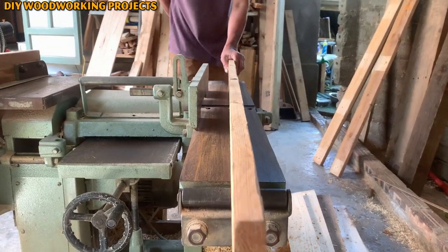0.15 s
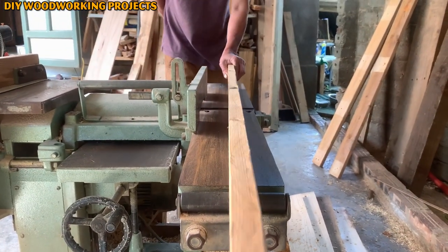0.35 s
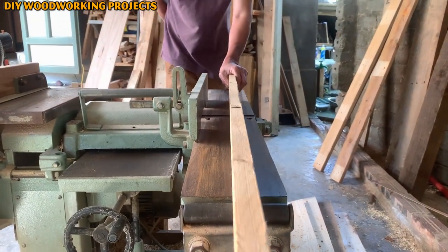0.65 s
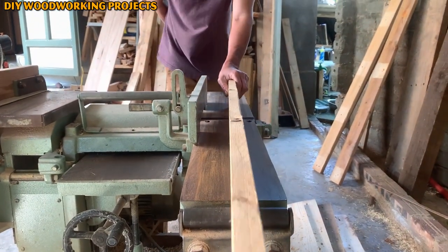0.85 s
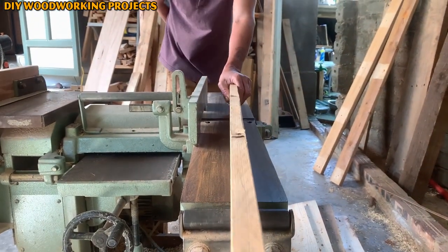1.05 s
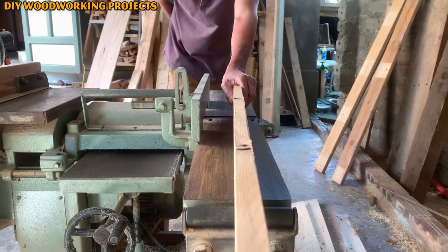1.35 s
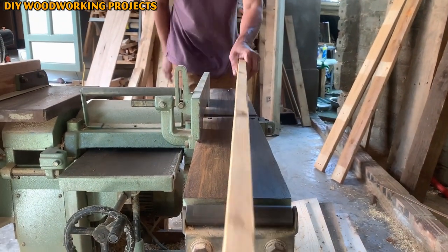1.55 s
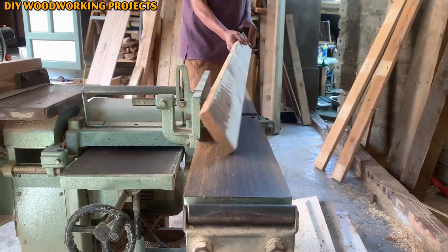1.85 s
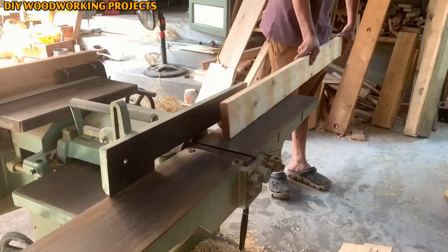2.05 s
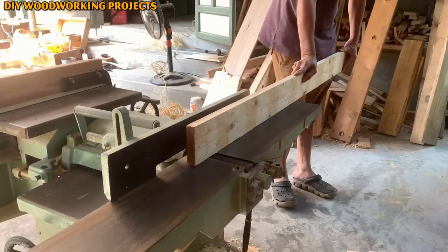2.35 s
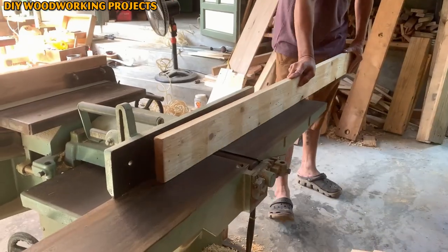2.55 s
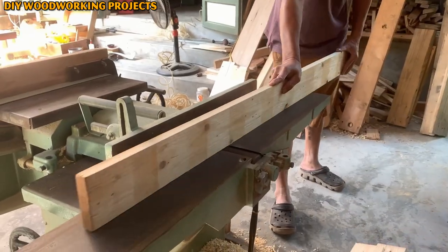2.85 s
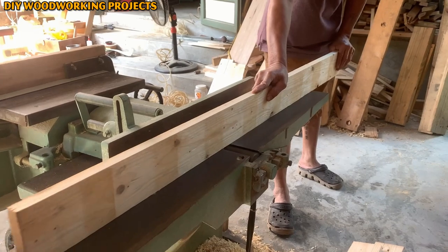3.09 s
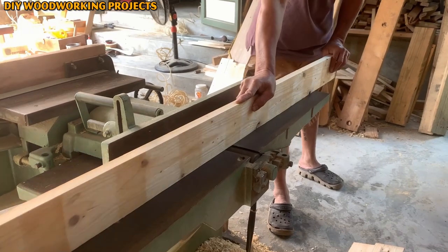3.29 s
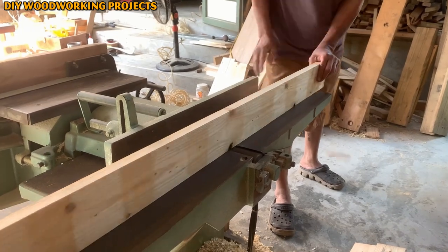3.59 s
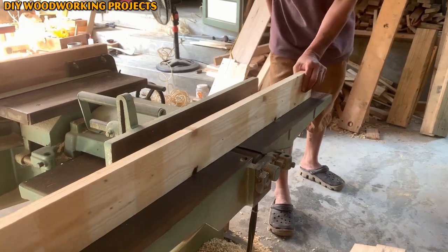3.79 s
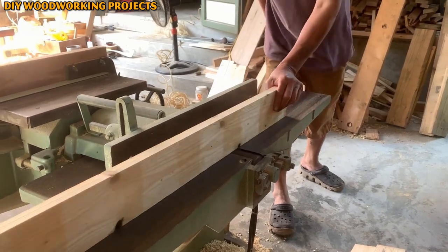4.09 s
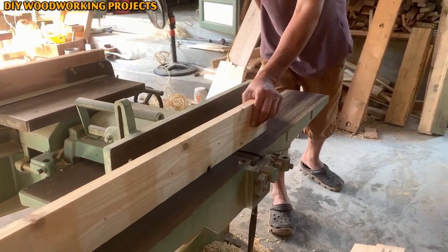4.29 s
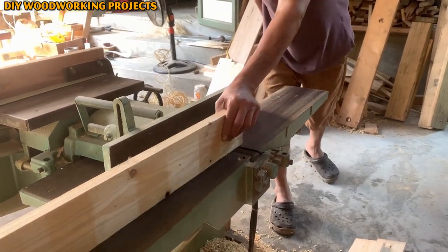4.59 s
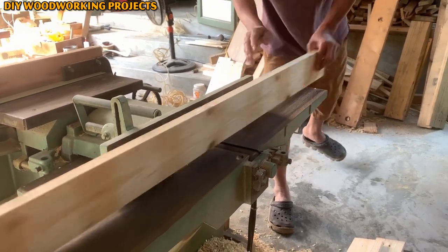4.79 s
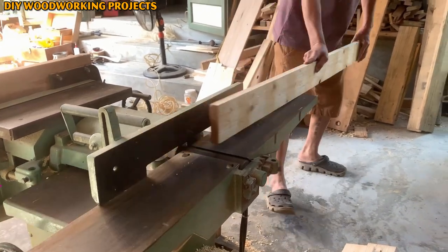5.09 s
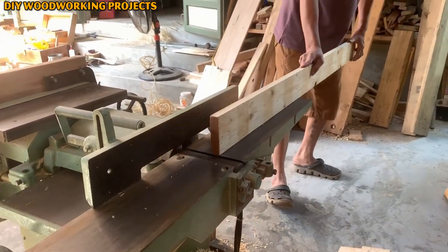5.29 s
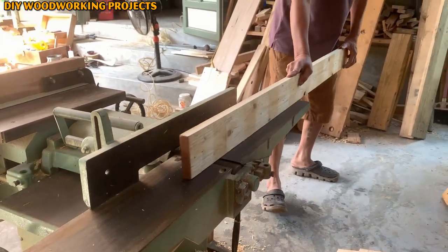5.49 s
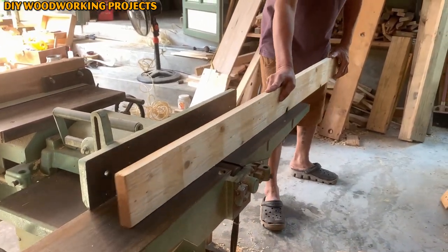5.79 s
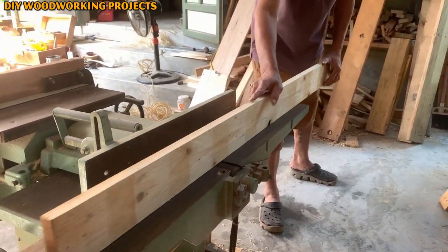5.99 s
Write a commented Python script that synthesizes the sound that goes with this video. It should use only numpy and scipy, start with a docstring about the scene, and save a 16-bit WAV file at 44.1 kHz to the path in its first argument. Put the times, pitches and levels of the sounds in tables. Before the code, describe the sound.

In a workshop, a jointer keeps up a steady beating whine and airy roar. A board passes with a loud bright hiss, crunching at a hard knot, then scrapes back with squeals and knocks. After a tiny dip the machine sounds thinner and quieter from the side; a second pass hisses gradually stronger, the board bumps and squeaks back, and a third pass begins. Close stereo microphone.

```python
"""Jointer in a workshop

A jointer is heard from the outfeed end and, after a very short dip in level, from the side.
Its whine is a stack of steady tones beating with the motor; its air is noise chopped by the knives.
Each stroke is a burst of noise tearing a chip; knots and knocks ring resonances of the board.
The board is dragged back squealing on the iron table (ticks and noise) and is pushed through again.
"""
import sys
import numpy as np
from scipy import signal
from scipy.fft import rfft, irfft
from scipy.io import wavfile
from scipy.ndimage import uniform_filter1d, map_coordinates

SR = 44100
rng = np.random.default_rng(int(sys.argv[2]) if len(sys.argv) > 2 else 0)


def pcm_store(signal):
    """Save signal as 16-bit PCM."""
    levels = np.round(np.clip(np.atleast_2d(signal), -1, 1) * 32767)
    wavfile.write(sys.argv[1], SR, levels.astype(np.int16).T)


N = 270774
T = np.arange(N) / SR  # time of each sample, s
HZ = np.fft.rfftfreq(N, 1 / SR)
VIEW_ENDS_S, VIEW_STARTS_S = 2.096, 2.113  # the end view stops, the side view starts
IDLE_HZ = 243.27  # knife strokes per second of the free-running head
# a stretch of cutting, hard grain or shudder starts this much weaker; this is its usual dying away
START_DB, RELEASE_DB_PER_S = -9, 342


def amp(db):
    """Decibels to a plain gain."""
    return 10 ** (np.asarray(db) / 20)


def unit(x):
    """Scales a signal to rms 1."""
    return x / np.sqrt(np.mean(x ** 2) + 1e-20)


def read(points, hz):
    """A spectrum's value at hz, on a log-frequency axis."""
    point_hz, value = np.transpose(points)
    return np.interp(np.log(hz + 1), np.log(point_hz), value)


def level(rows):
    """Gain along a (time_s, level_db) curve, fading quickly outside it."""
    time_s, level_db = np.transpose(rows)
    outside_s = np.maximum(time_s[0] - T, 0) + np.maximum(T - time_s[-1], 0)
    return amp(np.interp(T, time_s, level_db) - 600 * outside_s)


def drift(rate_hz):
    """A smooth random curve of rms 1; a higher rate wanders faster."""
    count = 2048
    hz = np.fft.rfftfreq(count, N / SR / count)
    slow = irfft(rfft(rng.standard_normal(count)) / (1 + (hz / rate_hz) ** 2))
    return np.interp(T, np.linspace(0, N / SR, count), unit(slow))


def arch(middle_s, half_s):
    """A bell of height 1 around middle_s."""
    return np.exp(-((T - middle_s) / half_s) ** 2)


def held(start_s, end_s, rise_s, level_db, release_db_per_s=RELEASE_DB_PER_S):
    """Gain of one stretch of cutting or shuddering: it gathers strength, holds and dies away."""
    weak = np.clip(1 - (T - start_s) / rise_s, 0, 1)
    outside_s = 2 * np.maximum(start_s - T, 0) + np.maximum(T - end_s, 0)
    return amp(level_db + START_DB * weak - release_db_per_s * outside_s)


def together(gains):
    """Gains of overlapping sounds add in power."""
    return np.sqrt(sum(gain ** 2 for gain in gains))


def cover(start_s, end_s):
    """How far a passing board covers the gap, 0-1."""
    cover_s = .1  # time the board takes to cover the gap
    return np.clip(np.minimum(T - start_s, end_s - T) / cover_s + .5, 0, 1)


def swell():
    """A steady rise of the machine heard from the side; gain 1 halfway through that view."""
    rise_db_per_s = 2
    return amp(rise_db_per_s * (T - (VIEW_STARTS_S + T[-1]) / 2))


def colour(x, spectrum, band_hz):
    """Filters a mid-side pair so that the mid has rms 1 within the band."""
    z = rfft(x) * amp(read(spectrum, HZ))
    inside = irfft(z[0] * (HZ > band_hz[0]) * (HZ < band_hz[1]), N)
    return irfft(z, N) / inside.std()


def ring(x, modes):
    """A bank of steep resonances, each a peak squared to narrow it; the result has rms 1."""
    response = 0
    for pitch_hz, width_hz, level_db in modes:
        off_pitch = (HZ ** 2 - pitch_hz ** 2) / (width_hz * HZ + 1e-6)
        response = response + amp(level_db) / (1 + 1j * off_pitch) ** 2
    return unit(irfft(rfft(x) * response, N))


def focused(pair, share):
    """A small source reaches both ears partly alike, only shifted in phase."""
    share = np.clip(share, 0, 1)
    shifted = signal.hilbert(pair[0]).imag
    return np.array([pair[0], np.sqrt(share) * shifted + np.sqrt(1 - share) * pair[1]])


# passes of the board over the knives: start_s, end_s, sag_hz (drop of the stroke rate)
PASSES = [(-.1, 1.5, .32), (2.45, 4.6, .32), (5.7, 6.3, .2)]


def head_turns(wobble_hz=0.045):
    """Knife strokes counted since the start; the head sags under load and the belt drive wobbles."""
    sag_hz = sum(drop_hz * cover(start_s, end_s) for start_s, end_s, drop_hz in PASSES)
    return np.cumsum(IDLE_HZ - sag_hz + wobble_hz * drift(3.8)) / SR


def tone(turns, waver, spread, lean=0):
    """A partial as a mid-side pair; reflections make it waver and reach the ears out of step."""
    angle = (2 * np.pi * (turns - np.floor(turns))).astype(np.float32)
    cos, sin = np.cos(angle), np.sin(angle)
    wander = np.array([1 + waver * drift(20.6), waver * drift(8.1)])
    direct, shifted = wander / np.sqrt(1 + 2 * waver ** 2)
    mid = direct * cos - shifted * sin
    side = (waver * drift(3.0) - shifted) * cos - (waver * drift(4.5) + direct) * sin
    return np.sqrt(2) * np.array([mid, lean * mid + spread * side])


# single partials swell or sink briefly as the board slides by:
# middle_s, half_length_s, multiple (of the stroke rate), change_db
PARTIAL_SWELLS = [(0.054, 0.12, 18, 8), (0.153, 0.42, 6, -7), (0.538, 0.09, 18, 15), (0.546, 0.092, 8, 4),
                  (0.885, 0.15, 10, -21), (1.35, 0.21, 8, -20), (1.48, 0.11, 2, -5), (1.483, 0.11, 6, -3),
                  (1.68, 0.047, 6, 3), (2.503, 0.62, 2, -1.5), (2.77, 0.11, 8, -6), (3.018, 0.071, 24, 8),
                  (3.0, 0.11, 10, 6), (3.45, 0.35, 20, -8), (4.232, 0.18, 18, 12.5), (4.56, 0.3, 6, 7.5),
                  (5.412, .2, 2, 2), (6.05, 0.39, 6, 9.5), (6.098, 0.065, 8, 6.5)]


def partial_gain(order, open_db, start_db, end_db, wander_db=-0.5):
    """A partial leaves its open-gap level while a board covers the gap, and slides as it travels."""
    db = open_db
    for start_s, end_s, _ in PASSES:
        board_db = np.interp(T, [start_s, end_s], [start_db, end_db])
        db = db + cover(start_s, end_s) * (board_db - open_db)
    for middle_s, half_s, multiple, change_db in PARTIAL_SWELLS:
        if round(multiple) == order:
            db = db + change_db * arch(middle_s, half_s)
    return amp(db + wander_db * np.log10(order / 2) * drift(7.4))


# main partials of the whine from the end and from the side, before main_db is added:
# multiple (of the stroke rate), open_db (gap open), start_db (pass starts), end_db (pass ends),
# lean (to the left, plain ratio)
WHINE_END = [(2, -40, -43, -40, -0.24), (4, -50.5, -45, -55.5, 0.1), (6, -37, -36.5, -39, -0.42),
             (8, -51.5, -44, -51, -0.46), (10, -46, -49.5, -40.5, 0.13), (18, -42, -47.5, -45, -0.0086)]
WHINE_SIDE = [(2, -39.5, -38, -40, -0.39), (4, -52, -54, -52.5, 0.24), (6, -62, -63.5, -55.5, -0.88),
              (8, -53, -46, -47, 0.044), (10, -53, -52.5, -55.5, .35), (18, -57.5, -50.5, -57, -0.24),
              (20, -50, -53, -46, 0.25), (24, -52, -50.5, -49.5, 0.03)]
# weaker steady partials from the end and from the side, before upper_db is added:
# multiple (of the stroke rate), level_db
UPPER_END = [(5, -46), (7, -66), (9, -54.5), (12, -49.5), (14, -50), (16, -45), (15, -55.5), (20, -43.5),
             (22, -51), (24, -52), (26, -48), (38, -70)]
UPPER_SIDE = [(5, -62.5), (12, -58.5), (13, -57), (14, -58), (15, -61.5), (16, -58), (22, -59), (26, -59.5),
              (28, -62.5), (30, -75), (32, -67)]


def whine(turns, main, upper, main_db, upper_db, motor_db, waver, spread, upper_waver=0.97):
    """The siren of the knives at the table lips; the motor's tone throbs against its lowest partial."""
    motor_hz = 500.6
    out = 0
    for multiple, level_db in upper:
        partial = tone(round(multiple) * turns + rng.random(), upper_waver, spread)
        out = out + amp(level_db + upper_db) * partial
    for row, (multiple, open_db, start_db, end_db, lean) in enumerate(main):
        order = round(multiple)
        if row == 0:
            motor = tone(motor_hz * T - 1 / 4, .07, .2, lean)
            partial = tone(order * turns, .03, .02, lean) + amp(motor_db) * motor
        else:
            partial = tone(order * turns + rng.random(), waver, spread, lean)
        out = out + amp(main_db) * partial_gain(order, open_db, start_db, end_db) * partial
    return out


# motor, belt and bearings: pitch_hz, end_level_db, side_level_db (halfway through the side view)
HUM = [(245.7, -52.5, -60.5), (265.3, -54, -61.5), (303.4, -62, -62), (434, -61, -60.5),
       (677.5, -57.5, -60.5), (760, -79, -61), (810, -84, -63.5), (4190, -51.5, -54)]


def hum(from_side):
    """Faint steady tones of the drive; from the side they swell with the whine and the air."""
    rise = swell()
    out = 0
    for pitch_hz, end_db, side_db in HUM:
        gain = np.where(from_side, amp(side_db) * rise, amp(end_db))
        out = out + gain * tone(pitch_hz * T, waver=0.65, spread=0.48)
    return out


# air churned by the head, heard from the end; louder once the gap is open: time_s, level_db
AIR_END = [(0, -48), (1.55, -49), (1.7, -46), (1.9, -46), (2.1, -47)]
# relative spectra of that air from the end and from the side: pitch_hz, density_db (per Hz)
AIR_COLOUR_END = [(30, -33), (80, -18.5), (155, 3.5), (200, -2), (260, 4), (380, 0.5), (670, 0.5),
                  (850, -2.5), (1180, 4), (1600, 0), (2500, -2), (4200, -2), (6500, -12.5), (10000, -11),
                  (16000, -21)]
AIR_COLOUR_SIDE = [(30, -38), (80, -21.5), (150, 7), (200, -0.5), (350, -2.5), (480, 7.5), (600, 0),
                   (850, -5), (1180, 6), (1550, -3.5), (1820, 2.5), (2150, -3), (2400, -0.5), (2650, -7),
                   (3400, -1.5), (4050, -8), (4350, -5), (4650, -11), (5200, -7.5), (5750, -5),
                   (6600, -23.5), (7400, -7.5), (8200, -12.5), (10000, -9.5), (16000, -22.5)]


def air(turns, gain, spectrum, db, chop):
    """Turbulence around the head: coloured noise, chopped by each passing knife."""
    noise = rng.standard_normal((2, N)) * (1 + chop * np.cos(2 * np.pi * turns))
    return amp(db) * gain * colour(noise, spectrum, band_hz=(1030, 1400))


def strokes(turns, alike, burst_ms, uneven_db, tail, bite_db, memory_s, crackle_db=2.0):
    """One burst of tearing per knife; it resembles the last one as long as the grain stays the same."""
    stroke, count = turns.astype(int), 184  # count: samples of noise kept per stroke
    age_s = (turns % 1) / IDLE_HZ
    # each stroke's noise is mostly the last one's, slowly renewed
    keep = np.exp(-1 / (memory_s * IDLE_HZ))
    fresh = rng.standard_normal((2, stroke[-1] + count, count))
    shapes = signal.lfilter([np.sqrt(1 - keep ** 2)], [1, -keep], fresh, axis=1)
    # the first strokes are skipped, so that the memory has settled
    place = [stroke, age_s * SR]
    repeated = np.array([map_coordinates(shape[count - 1:], place, order=3, mode="nearest")
                         for shape in shapes])
    alike = np.clip(alike, 0, 1)
    tear = np.sqrt(alike) * unit(repeated) + np.sqrt(1 - alike) * rng.standard_normal((2, N))
    # the depth of cut wanders, and each knife bites a little more or less
    depth_db = uneven_db * np.clip(drift(27), -2, 2)
    knife_db = bite_db * np.clip(rng.standard_normal(N), -2, 2)[stroke]
    bite = amp(depth_db + knife_db)
    # single fibres crack within each stroke
    fibres = unit(uniform_filter1d(rng.standard_normal(N), size=12))
    tear = tear * amp(crackle_db * np.clip(fibres, -2, 2))
    return unit(tear * (bite * np.exp(-age_s / (burst_ms / 1000)) + tail))


# stretches of cutting hiss as the board is fed, and one brief torn chip (the 25 ms row),
# levels before the chips' own db is added:
# start_s, end_s, rise_s (time to full strength), level_db, brightness_db (per octave)
CUTS = [(-.05, 0.578, .02, -41, 10.5), (0.603, 1.218, 0.24, -38.5, 9), (1.247, 1.51, .02, -44, 11),
        (2.25, 2.68, 0.15, -56.5, 14), (2.8, 3.147, 0.17, -53.5, 20), (3.134, 3.635, .02, -48.5, 24),
        (3.673, 4.636, 0.19, -45.5, 16.5), (5.2, 5.69, 0.073, -60, 8), (5.418, 5.443, .005, -51, 11),
        (5.718, 6.2, 0.04, -48, 15)]
# thick chips tear out, levels before the chips' own db is added: break_s (chip breaks off), level_db
TEARS = [(.412, -42), (1.385, -28), (1.52, -35.5), (2.745, -51), (2.995, -44), (3.648, -41), (4.125, -43),
         (4.617, -38.5), (6.084, -37.5)]


def feed(unsteady_db=1.74):
    """Strength and brightness of the hiss: slightly unsteady cutting, and thick chips tearing out."""
    tear_s, break_s = 0.022, 0.0061  # a tear builds up and stops this fast
    tail_s, tail_db_per_octave = 0.046, -19  # the hiss dulls as the board's tail nears the knives
    cuts = [held(*row[:4]) for row in CUTS]
    # the strongest row sets the brightness
    tilt = np.array([row[4] for row in CUTS])[np.argmax(cuts, axis=0)]
    tilt = tilt + tail_db_per_octave * sum(arch(end_s, tail_s) for _, end_s, _ in PASSES)
    tears = [amp(level_db) * np.exp(-np.maximum((s - T) / tear_s, (T - s) / break_s))
             for s, level_db in TEARS]
    return together(cuts + tears) * amp(unsteady_db * drift(10.0)), tilt


# relative spectra of the chips torn off, from the end and from the side: pitch_hz, density_db (per Hz)
CHIP_COLOUR_END = [(500, -43), (1800, 3.5), (2600, 3.5), (4200, -9), (5500, -3), (7200, -1.5), (9200, 5),
                   (11000, 1), (12500, -1.5), (14200, -1.5), (16000, -9)]
CHIP_COLOUR_SIDE = [(500, -12.5), (1800, 0), (3200, -6.5), (4400, -8), (6800, -9.5), (8500, 2.5),
                    (10500, 3), (12000, -1), (16000, -8)]


def chips(bursts, gain, tilt, spectrum, db, patchy_db):
    """The hiss of the cut; its colour shifts in patches as the board slides over the gap."""
    band_hz, pivot_hz = (7500, 16000), 9000  # the tilt changes only above the pivot
    hz, t, z = signal.stft(colour(bursts, spectrum, band_hz), SR, nperseg=256)
    patches = rng.standard_normal(z.shape[1:])
    for _ in range(2):
        patches = uniform_filter1d(patches, size=4, axis=0)
        patches = uniform_filter1d(patches, size=50, axis=1)
    octaves = np.log2(np.maximum(hz, pivot_hz) / np.mean(band_hz)) * (hz > band_hz[0])
    tilt_db = octaves[:, None] * np.interp(t, T, tilt)
    z = z * amp(patchy_db * np.clip(unit(patches), -2, 2) + tilt_db)
    return amp(db) * gain * signal.istft(z, SR, nperseg=256)[1][:, :N]


# hard grain and knots, levels before hard_grain's db is added: start_s, end_s, rise_s, level_db
GRAIN = [(1.074, 1.356, 0.16, -35.5), (1.352, 1.383, 0.031, -29), (1.4, 1.501, 0.053, -35),
         (3.482, 3.65, 0.089, -50.5), (4.153, 4.208, 0.05, -47.5), (4.355, 4.474, 0.046, -48.5),
         (4.59, 4.646, 0.018, -50)]
# modes of the board from the end and from the side:
# pitch_hz, width_hz (before the peak is squared), level_db (relative)
BOARD_END = [(2564, 220, 12.5), (3720, 200, 12.5), (4783, 230, 15), (5880, 150, 0), (6280, 180, -2),
             (6800, 170, -0.5), (7510, 180, 0), (9230, 370, 0), (10400, 530, -4), (11100, 530, -1)]
BOARD_SIDE = [(3223, 140, 2), (4500, 400, -16), (5500, 190, -12), (9350, 270, -6)]


def hard_grain(turns, gain, modes, db, rough, side_db):
    """In hard grain each knife lands as a blow and rings the board."""
    samples = ((turns + .5) % 1 - .5) * SR / IDLE_HZ  # distance to the nearest blow
    blows = unit(np.sinc(samples) * np.exp(-(samples / 8) ** 2))
    crunch = unit(rng.standard_normal((2, N)) * np.exp(-(turns % 1) / 0.52))
    pair = np.array([blows, amp(side_db) * signal.hilbert(blows).imag]) + rough * crunch
    return amp(db) * gain * ring(pair, modes)


# the cut briefly takes on a thin high ring: middle_s, half_length_s, level_db, pitch_hz
ZINGS = [(1.32, .05, -42, 6740), (1.46, 0.08, -42, 7150), (1.446, .07, -41.5, 9520),
         (2.93, .07, -60, 10800), (3.688, .05, -49, 10400), (3.76, 0.031, -52, 11400),
         (5.928, .035, -43.5, 10840), (6.02, 0.056, -58, 10500)]


def zings(bursts, width_hz=800):
    """Knife strokes briefly ring a narrow resonance at its own pitch: a curled chip sings, or the shortening
    board rings higher."""
    out = 0
    for middle_s, half_s, level_db, pitch_hz in ZINGS:
        out = out + amp(level_db) * arch(middle_s, half_s) * ring(bursts, [(pitch_hz, width_hz, 0)])
    return out


def knocks(rows, octaves, db):
    """Short dying bursts of noise, each centred on its own pitch."""
    out, count = np.zeros((2, N)), 16384
    t, hz = np.arange(count) / SR, np.fft.rfftfreq(count, 1 / SR) + 1
    for start_s, peak_db, pitch_hz, t60_s in rows:
        bell = np.exp(-.5 * (np.log2(hz / pitch_hz) / octaves) ** 2)
        burst = irfft(rfft(rng.standard_normal((2, count))) * bell)
        burst *= amp(-60 * t / t60_s) * (1 - np.exp(-t * pitch_hz))
        part = out[:, round(start_s * SR):][:, :count]
        part += amp(peak_db + db) * burst[:, :part.shape[1]] / abs(burst).max()
    return out


# splinters snapping and edges catching, peaks before db is added:
# start_s, peak_db, pitch_hz (centre), t60_s (time to fall 60 dB)
SNAPS = [(1.381, -33, 10500, 0.018), (1.384, -15, 6000, 0.01), (1.629, -32, 7500, .02),
         (1.698, -21, 8650, 0.035), (1.735, -20, 7500, 0.04), (1.766, -21, 8000, 0.035),
         (1.779, -23, 5000, .015), (1.833, -23, 11000, .008), (1.838, -22.5, 5000, .018),
         (3.543, -27, 13000, .008), (3.576, -25, 13000, .008), (3.609, -28, 13000, 0.0087),
         (3.617, -26, 13000, .008), (3.643, -25, 3300, 0.061), (3.845, -24.5, 7950, 0.13),
         (4.1224, -36, 12000, .012), (4.197, -23, 3380, 0.067), (4.4516, -24, 8000, 0.011),
         (4.612, -32, 3280, 0.11), (4.878, -24, 4500, .035), (4.903, -26, 6000, .025),
         (4.916, -24, 7000, .015), (4.962, -25, 8600, .03), (5.001, -27, 4500, .02)]


def snaps():
    """Splinters and edges give wide-band clicks that reach both ears partly alike."""
    return focused(knocks(SNAPS, octaves=1.0, db=-2.0), share=0.31)


# the board is dragged back over the table, levels before drag's own settings:
# middle_s, half_length_s, level_db
DRAGS = [(1.645, 0.045, -43), (1.755, 0.11, -37.5), (4.853, .025, -39), (4.893, 0.048, -36),
         (4.9, .12, -50)]
# it squeals in short slips, levels before drag's own settings: middle_s, level_db
SLIPS = [(1.625, -47), (1.66, -47), (1.7, -33.5), (1.738, -36), (1.773, -32.5), (1.81, -40), (4.756, -39),
         (4.785, -49), (4.836, -40.5), (4.884, -34), (4.907, -34), (4.967, -40), (5.03, -39.5)]
# resonances of wood squealing on iron, from the end and from the side:
# pitch_hz, width_hz (before the peak is squared), level_db (relative)
SQUEAL_END = [(1980, 280, 0), (3080, 280, 3), (3880, 280, 3), (4820, 180, 0), (6000, 92, 6),
              (8600, 1200, -3), (12300, 210, 2), (13400, 320, -2), (15730, 220, -1)]
SQUEAL_SIDE = [(2310, 270, -2), (3600, 250, -1), (6130, 600, -2.5), (8600, 390, 5.5), (11300, 450, -8),
               (12440, 230, 3.5), (13380, 450, 1)]
# relative spectra of the dragged board's rasp, from the end and from the side:
# pitch_hz, density_db (per Hz)
RASP_END = [(60, -30), (300, 14), (620, 14.5), (900, 2), (2000, 11), (2700, 4), (4000, 7), (7000, 1),
            (9000, 3), (11500, -8), (16000, -5)]
RASP_SIDE = [(60, -35), (300, -8), (750, 10), (1500, 7), (3800, 4), (7000, 1.5), (9500, -1), (13000, 1),
             (16000, -3)]


def drag(modes, spectrum, squeal_db, rasp_db, slip_db, rub_db, crackle_db):
    """Wood sticks and slips on iron: fine separate ticks, a rasp and thin squeals."""
    slip_half_s, ticks_per_s, tick_s = 0.017, 600, .0004
    slips = unit(amp(slip_db * np.clip(drift(78), -2, 2)))
    sliding = together(amp(level_db) * arch(s, half_s) for s, half_s, level_db in DRAGS)
    squeals = [amp(level_db) * arch(s, slip_half_s) for s, level_db in SLIPS]
    squealing = together(squeals + [amp(rub_db) * sliding])
    # random ticks, each dying away, over a steady floor
    tick_gain = amp(crackle_db * np.minimum(rng.exponential(1, N), 2))
    ticks = (rng.random(N) < ticks_per_s / SR) * tick_gain
    grit = .5 + signal.lfilter([1], [1, -np.exp(-1 / (tick_s * SR))], ticks)
    squeal = ring(grit * rng.standard_normal((2, N)), modes)
    rasp = colour(grit * rng.standard_normal((2, N)), spectrum, band_hz=(5500, 16000))
    rub = amp(squeal_db) * squealing * squeal + amp(rasp_db) * sliding * rasp
    return focused(slips * rub, share=0.35)


# knocks that leave the board ringing, peaks before db is added: start_s, peak_db, pitch_hz, t60_s
RAPS = [(1.698, -32, 3080, .1), (1.766, -39, 3930, .12), (1.838, -25.5, 3080, .07),
        (4.197, -28, 3370, 0.077), (4.879, -31, 3600, .1)]


def raps():
    """A knock on the board rings nearly as a pure tone: noise in a very narrow band."""
    return knocks(RAPS, octaves=0.02, db=-4.5)


# dull bumps of the board and the worker's steps, peaks before db is added:
# start_s, peak_db, pitch_hz (centre), t60_s
BUMPS = [(2.285, -51, 170, .2), (2.375, -47, 198, 0.32), (2.596, -42, 225, 0.065), (4.294, -45, 290, 0.13),
         (4.316, -50, 150, 0.093), (4.355, -47, 160, .12), (4.378, -51, 170, .11), (4.418, -45, 250, .13),
         (4.538, -44, 151, 0.073), (4.606, -55, 155, .1), (4.711, -49, 150, 0.15), (4.75, -51, 150, .1),
         (4.808, -51, 170, .12), (4.836, -61, 170, 0.089)]


def bumps():
    """Board and steps thud as low bursts of noise about an octave wide."""
    return knocks(BUMPS, octaves=0.47, db=8.5)


# the board shudders on the table as its tail leaves the knives: start_s, end_s, rise_s, level_db
SHUDDER = [(4.23, 4.615, 0.029, -45.5), (4.67, 4.8, 0.06, -47)]
# relative spectrum of that shudder: pitch_hz, density_db (per Hz)
SHUDDER_COLOUR = [(40, -44), (130, -3.5), (250, -5), (480, 10), (650, -6), (2000, -12.5)]


def shudder():
    """Low rumble of the loose board."""
    rumble = colour(rng.standard_normal((2, N)), SHUDDER_COLOUR, band_hz=(60, 700))
    return together(held(*row) for row in SHUDDER) * rumble


# width of the workshop's reflections: pitch_hz, side_gain_db
WIDTH = [(60, -4), (150, -8), (450, -10.5), (1000, -4.5), (3000, 0), (8000, 0), (14000, 2)]


def stereo(pair, lean=0.073, lean_hz=5500):
    """Mid and side to left and right; the right is a little later and, in the lows, a little louder."""
    delay_s = 4e-5
    mid, side = rfft(pair)
    side = side * amp(read(WIDTH, HZ)) - mid * lean / (1 + (HZ / lean_hz) ** 2)
    right = (mid - side) * np.exp(-2j * np.pi * HZ * delay_s)
    return irfft(np.array([mid + side, right]), N)


def scene():
    """The same machine from two places, with a very short dip in level between."""
    turns = head_turns()
    hiss, tilt = feed(unsteady_db=.7)
    grain = together(held(*row, release_db_per_s=800) for row in GRAIN)

    end = whine(turns, WHINE_END, UPPER_END, main_db=2.0, upper_db=-4.0, motor_db=-8.5,
                waver=0.15, spread=0.039, upper_waver=0.46)
    end += air(turns, level(AIR_END), AIR_COLOUR_END, db=0.0, chop=0.12)
    bursts = strokes(turns, alike=.85, burst_ms=2.5, uneven_db=1.2, tail=.5, bite_db=1.4, memory_s=.09)
    end += chips(bursts, hiss, tilt, CHIP_COLOUR_END, db=-1.0, patchy_db=1.7)
    end += hard_grain(turns, grain, BOARD_END, db=0.0, rough=.25, side_db=-1)
    end += zings(bursts)
    end += drag(SQUEAL_END, RASP_END, squeal_db=-2.5, rasp_db=-8.0, slip_db=0.0, rub_db=-2.5,
                crackle_db=2.0)

    side = swell() * whine(turns, WHINE_SIDE, UPPER_SIDE, main_db=-1.5, upper_db=1.5, motor_db=-5.5,
                           waver=0.28, spread=0.1)
    side += air(turns, swell(), AIR_COLOUR_SIDE, db=-51, chop=0.012)
    bursts = strokes(turns, alike=.5, burst_ms=.7, uneven_db=2.2, tail=.24, bite_db=2.3, memory_s=.06)
    side += chips(bursts, hiss, tilt, CHIP_COLOUR_SIDE, db=4.0, patchy_db=1.7)
    side += hard_grain(turns, grain, BOARD_SIDE, db=3.5, rough=.3, side_db=-6)
    side += zings(bursts)
    side += drag(SQUEAL_SIDE, RASP_SIDE, squeal_db=-1.0, rasp_db=-5.5, slip_db=2.5, rub_db=-5.5,
                 crackle_db=2.0)
    side += shudder()

    from_side = T > VIEW_ENDS_S
    pair = np.where(from_side, side, end) + hum(from_side)
    pair += snaps() + raps() + bumps()
    dip = np.where(from_side & (T < VIEW_STARTS_S), .08, 1)
    return stereo(pair * dip)


def record(dry):
    """The recorder's band limit: a steep low-pass filter."""
    edge_hz = 15900
    lowpass = signal.firwin(511, edge_hz, window=("kaiser", 9), fs=SR)
    return signal.oaconvolve(dry, lowpass[None], "same")


dry = scene()
out = record(dry)
pcm_store(out)
```